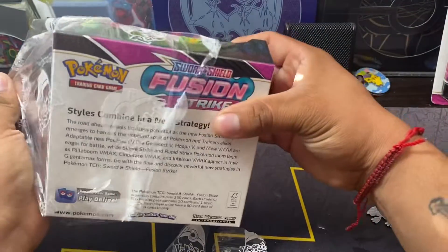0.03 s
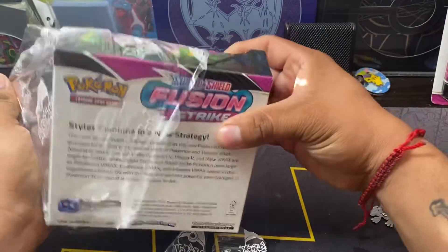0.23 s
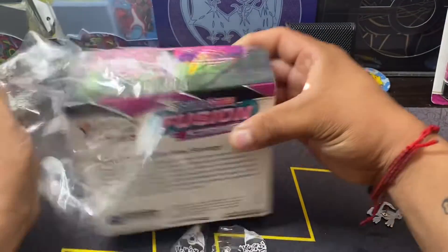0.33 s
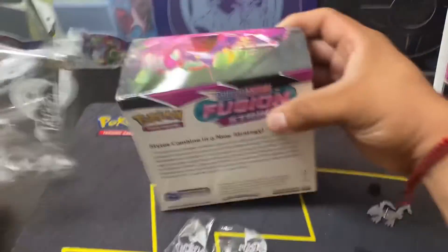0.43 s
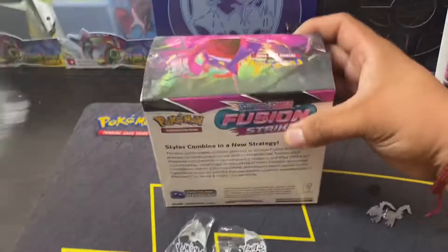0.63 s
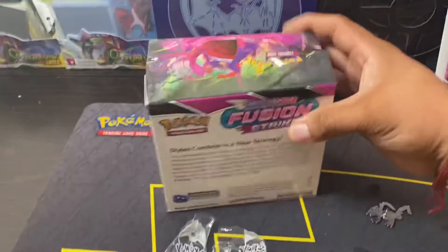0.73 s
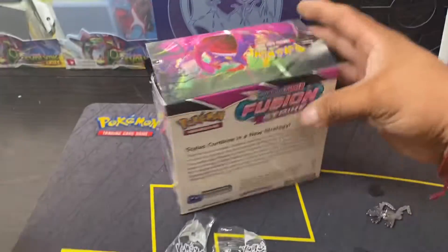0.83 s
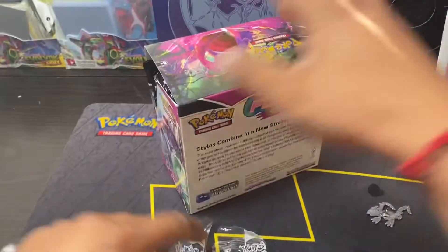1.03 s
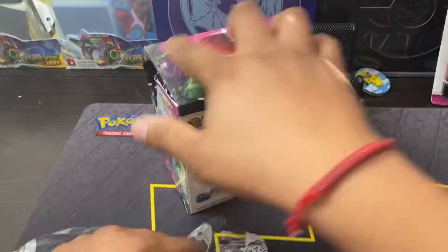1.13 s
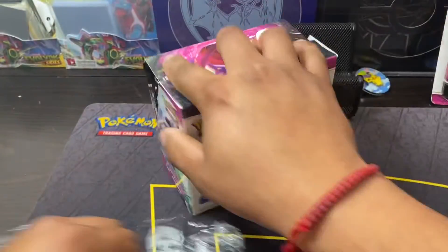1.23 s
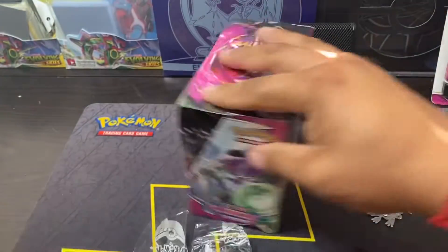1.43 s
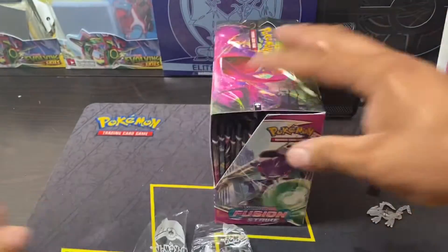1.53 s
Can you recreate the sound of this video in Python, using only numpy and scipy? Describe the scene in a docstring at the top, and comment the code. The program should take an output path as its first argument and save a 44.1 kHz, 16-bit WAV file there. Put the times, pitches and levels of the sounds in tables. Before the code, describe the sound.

Crisp shrink wrap rips sharply from a small carton with a hollow cardboard knock, then crackles faintly as hands handle film and box at a table, close up in a quiet room, mono.

```python
"""At a table in a quiet room, thin shrink film is ripped off a cardboard box: two loud tears with a dense rip between.
Then single snaps stand out over a fine crackle as the film is crumpled and hands slide on the box.
Film sounds are short noise bursts and ringing creases; the box and table are sets of fading sine tones.
A low flutter sags in pitch after the tear, walls answer the snaps and knocks, and soft hiss and rumble lie behind."""
import sys
import numpy as np
from scipy import signal
from scipy.fft import rfft, irfft, next_fast_len
from scipy.io import wavfile
from scipy.ndimage import uniform_filter1d

SR = 44100
rng = np.random.default_rng(int(sys.argv[2]) if len(sys.argv) > 2 else 0)


def ratio_of_db(decibels):
    """Turn decibels (scalar or array-like) into linear amplitude factors; 0 dB maps to 1."""
    return 10 ** (np.asarray(decibels, float) / 20)


def digitize_waveform(pressure):
    """Quantize a signal to 16-bit integers and store it at the path in sys.argv[1].

    Rows of a 2-D input are taken as channels; values are limited to [-1, 1].
    """
    field = np.atleast_2d(pressure).T
    bounded = np.clip(field, -1, 1)
    quanta = np.round(bounded * 32767).astype(np.int16)
    wavfile.write(sys.argv[1], SR, quanta)


N = 70560  # length in samples: 1.6 s

# single snaps of the film: t/s, relative level/dB, low crease f/Hz, high crease f/Hz,
# low crease over high crease level/dB, fade by 60 dB t/s
SNAPS = [(0.0086, -26.5, 6400, 11400, -16, 0.0072), (0.0625, -35.5, 1800, 9600, 19, 0.015),
         (0.0726, -32, 6370, 9280, 5, 0.0075), (0.0775, -28, 6800, 10600, -16, 0.016),
         (0.111, -31, 2000, 12200, 1, 0.0056), (0.137, -36, 2000, 9700, 0, 0.012),
         (0.183, -32.5, 2000, 10500, -1, 0.0093), (0.1962, -17.5, 4940, 10100, 10, 0.0062),
         (0.21, 0, 4230, 10800, 1.5, 0.0056), (0.2136, -11, 2980, 10700, -4, 0.006),
         (0.2317, -18, 1810, 10300, -13, 0.017), (0.28, -20, 6750, 10500, -7, 0.015),
         (0.2853, -4, 7460, 10400, -18, 0.008), (0.2877, -8.5, 7500, 9700, 2, 0.008),
         (0.3232, -21, 7260, 9700, -7, 0.015), (0.3424, -42, 5430, 10800, -3, 0.011),
         (0.394, -33.5, 3600, 11800, 9, 0.011), (0.411, -26.5, 6800, 11200, -10, 0.0084),
         (0.449, -32, 6060, 9110, 15, 0.0083), (0.4625, -32.5, 3380, 11000, 5, 0.011),
         (0.562, -18, 6100, 9600, 4.5, 0.0064), (0.562, -29.5, 2060, 3600, 16, 0.01),
         (0.582, -21, 3550, 11100, -30, 0.012), (0.597, -34.5, 3300, 11800, 2, 0.013),
         (0.6033, -25.5, 3160, 9450, 0, 0.0065), (0.6575, -39, 6170, 11500, 8, 0.011),
         (0.7256, -33, 5840, 12300, -15, 0.017), (0.7583, -25, 4400, 6200, 1, 0.02),
         (0.761, -27.5, 3650, 9600, 4, 0.015), (0.804, -27.5, 6620, 11700, -21, 0.014),
         (0.8154, -35, 3470, 9920, -1, 0.017), (0.863, -36, 4070, 10300, 8, 0.013),
         (0.876, -34, 6970, 10800, -6, 0.011), (0.8886, -33, 4700, 9820, 2, 0.029),
         (0.9389, -28, 2330, 10200, -4, 0.0069), (0.945, -32, 6120, 10000, -2, 0.012),
         (0.9684, -31, 6660, 9800, 7, 0.0098), (0.9782, -27.5, 3830, 5500, 9, 0.02),
         (0.998, -29, 4830, 11000, 0, 0.011), (1.0128, -31, 5770, 10100, 15, 0.012),
         (1.0253, -27, 5920, 10200, 18, 0.0083), (1.049, -28, 6000, 12700, 16, 0.013),
         (1.094, -26.5, 5830, 13500, -9, 0.014), (1.1102, -24, 6000, 9800, 8, 0.0065),
         (1.128, -22.5, 5300, 13700, 2, 0.011), (1.1357, -17.5, 4900, 10200, -3, 0.006),
         (1.1533, -26, 5220, 10000, 7, 0.0095), (1.1714, -26.5, 4900, 13000, -21, 0.022),
         (1.1902, -24, 6440, 10200, -19, 0.013), (1.2062, -31, 6150, 10500, -8, 0.011),
         (1.289, -41, 1730, 12200, 10, 0.019), (1.3684, -33, 6400, 10100, 4, 0.0083),
         (1.4414, -28, 2600, 9000, -3, 0.0056), (1.5123, -31.5, 5800, 9650, -5, 0.011),
         (1.539, -25.5, 2500, 11400, 4, 0.01), (1.5536, -29, 6170, 7500, -3, 0.01)]
# hands on film and box: t/s, crackle level/dB, low cardboard rub level/dB
HANDLING = [(0, -69, -54.5), (.05, -90, -65), (.1, -52, -58.5), (.17, -61, -66), (.205, -57, -52),
            (0.224, -60, -37.5), (.245, -37.5, -48.5), (.26, -35, -45), (.275, -38, -47.5),
            (0.299, -41, -43), (.315, -39, -46), (0.34, -36, -44), (0.369, -54.5, -57), (.42, -52.5, -55),
            (.47, -56.5, -60), (.485, -70, -63), (.55, -56, -63), (.575, -61, -60), (0.611, -45.5, -49.5),
            (.63, -55, -62), (.7, -56.5, -59.5), (.76, -49.5, -61), (.79, -53.5, -65.5), (.88, -49.5, -56),
            (.92, -53, -63.5), (.96, -47.5, -53.5), (1.04, -44.5, -53), (1.07, -54.5, -62.5),
            (1.14, -43, -50), (1.2, -45, -57), (1.3, -48, -60.5), (1.33, -50.5, -65), (1.43, -58, -71),
            (1.521, -57.5, -70), (1.557, -49, -55), (1.6, -67, -65)]
# tone of the film: f/Hz, relative level/dB (per Hz)
FILM_TONE = [(700, -25.5), (1200, -2.5), (1800, -8), (2600, -13), (3300, -7), (4200, -6.5), (5200, -6),
             (7000, -6.5), (8500, -6), (10300, -2), (12000, -4), (14500, -6), (16000, -9)]
# tone of the rub on cardboard: f/Hz, relative level/dB (per Hz)
RUB_TONE = [(100, -34.5), (200, -6), (350, -4), (620, -1), (900, 2), (1300, -2.5), (1800, -8.5),
            (2500, -16.5), (4000, -64.5)]
# papery rustle in the low treble: t/s, level/dB
RUSTLE = [(0, -82), (.2, -63), (.23, -46), (.33, -66), (.37, -77), (.6, -65), (.7, -75), (.9, -75),
          (.97, -63.5), (1.07, -72.5), (1.15, -63.5), (1.29, -57.5), (1.33, -70), (1.4, -70), (1.46, -63),
          (1.52, -71.5), (1.56, -57), (1.6, -72)]
# tone of the rustle: f/Hz, relative level/dB (per Hz)
RUSTLE_TONE = [(1000, -25), (1450, -4.5), (1850, -1.5), (2200, -13.5), (3000, -36.5)]
# hollow knocks of the box: t/s, relative level/dB, tilt/dB per octave, pitch ratio from the grip
KNOCKS = [(0.061, -51.5, 3, 1.07), (0.2107, -22, 2, 1.12), (0.2112, -26, -6, 1.34),
          (0.2856, -17.5, 1.5, .98), (0.315, -42.5, -10, 0.99), (0.32, -29.5, 1, 0.94),
          (0.448, -44.5, 9.5, 1.05), (0.561, -47.5, 7, 1.1), (0.604, -51, 6, 1.15), (1.033, -40, 3.5, 0.96),
          (1.087, -45, 3, 0.88), (1.444, -57, 17, 0.96)]
# ringing modes of the box before the grip shifts them: f/Hz, relative level/dB, fade by 60 dB t/s
BOX_MODES = [(355, -12.5, 0.038), (461, 6.5, 0.017), (584, 14.5, 0.016), (925, 10, 0.022), (995, 10, 0.022),
             (1528, -3.5, 0.024), (1887, -5.5, 0.024)]
# thuds on the table: t/s, then level/dB of each of the four modes, share of the free ring time
THUDS = [(0.3187, -36.5, -62, -45, -40.5, 1.06), (1.0262, -41, -35, -44, -38, 0.32)]
# modes of the table top ringing freely: f/Hz, fade by 60 dB t/s
TABLE_MODES = [(62, 0.59), (114, 0.36), (232, 0.2), (340, 0.1)]
# echo of the room: f/Hz, fade by 60 dB t/s
WALLS = [(300, 0.52), (3000, 0.19), (12000, 0.27)]
# tone of the room's hiss: f/Hz, relative level/dB (per Hz)
HISS_TONE = [(100, -33.5), (190, -9), (300, -4), (900, -6), (1800, -18.5), (2800, -19), (4400, -14),
             (7000, -16), (10500, -13.5), (14000, -15), (16000, -34)]
# tone of the room's rumble: f/Hz, relative level/dB (per Hz)
RUMBLE_TONE = [(25, -35), (42, -0.5), (60, -3), (85, -15.5), (122, -1.5), (150, -8.5), (200, -35)]

LAG_S = 0.0008  # snaps and knocks start this long after their listed times
RISE_S = 0.0002  # quick rise of the rattle and of the crackle's grains


def unit(x):
    """Scale to an average strength (rms) of 1."""
    return x / np.sqrt(np.mean(x ** 2) + 1e-20)


def along(points, hz):
    """Read a curve of (Hz, value) points on a log frequency axis."""
    f, v = np.transpose(points)
    return np.interp(np.log(hz + 1), np.log(f + 1), v)


def coloured(x, tone):
    """Filter to the given tone without sounding ahead of the input; mean power gain is 1."""
    m = 2 * next_fast_len(len(x) // 2 + 4096)
    gain_db = np.maximum(along(tone, np.fft.rfftfreq(m, 1 / SR)), -80)
    # Folding the cepstrum puts the whole response after the input (minimum phase).
    cepstrum = irfft(np.log(unit(ratio_of_db(gain_db))), m)
    cepstrum[1:m // 2] *= 2
    cepstrum[m // 2 + 1:] = 0
    response = np.exp(rfft(cepstrum))
    return irfft(rfft(x, m) * response, m)[:len(x)]


def noise_like(tone):
    """Steady noise of the given tone, rms 1."""
    return unit(coloured(rng.standard_normal(N), tone))


def add(track, s, sound):
    """Mix a sound in at time s."""
    i = max(round(s * SR), 0)
    track[i:i + len(sound)] += sound[:len(track) - i]


def fade(t, t60, rise):
    """Quick rise, then an exponential fall by 60 dB in t60 seconds."""
    return (1 - np.exp(-t / rise)) * ratio_of_db(-60 * t / t60)


def patchy(x, depth_db):
    """Make random patches of time and frequency louder or softer."""
    z = signal.stft(x, nperseg=128)[2]
    field = uniform_filter1d(rng.standard_normal(z.shape), 4, 0)
    field = uniform_filter1d(field, 16, 1)
    return signal.istft(z * ratio_of_db(depth_db * unit(field)), nperseg=128)[1][:N]


def crease(push, hz):
    """A fold of the film rings at its own pitch when pushed."""
    return unit(signal.lfilter(*signal.iirpeak(hz, 5.1, SR), push))


def snaps():
    """Each snap: a sharp pluck rings two creases, with a broad crack and a short rattle after."""
    snap_db, pluck_db, crack_db = -7.5, 13, -4
    rattle_db, rattle_t60 = -14, 0.07
    out, t = np.zeros(N), np.arange(SR // 10) / SR
    for s, db, low_hz, high_hz, low_db, t60 in SNAPS:
        noise = rng.standard_normal((4, len(t)))
        shape = fade(t, t60, 0.03 * t60)
        pluck = ratio_of_db(pluck_db) * (np.arange(len(t)) == np.argmax(shape))  # one sample at the peak
        low = crease(noise[0] * shape + pluck, low_hz)
        high = crease(noise[1] * shape + pluck, high_hz)
        broad = ratio_of_db(crack_db + max(low_db, 0)) * unit(noise[2] * shape)
        snap = unit(broad + ratio_of_db(low_db) * low + high)
        snap = snap * np.sqrt(np.mean(shape ** 2))  # the strength of the fading shape
        rattle = ratio_of_db(rattle_db) * noise[3] * fade(t, rattle_t60, RISE_S)
        add(out, s + LAG_S, ratio_of_db(db + snap_db) * (snap + rattle))
    return coloured(out, FILM_TONE)


def handling():
    """Countless tiny creases crackle over a smooth slide; cardboard adds a low rub and a papery rustle."""
    grains_per_s, grain_t60, size_spread_db = 1300, 0.0054, 5.5
    smooth_db, patchy_db = 1, 1.5
    s, crackle_db, rub_db = np.transpose(HANDLING)
    t = np.arange(N) / SR
    sizes = ratio_of_db(size_spread_db * np.clip(rng.standard_normal(N), -2, 2))
    hits = (rng.random(N) < grains_per_s / SR) * sizes
    swell = signal.fftconvolve(hits, fade(t[:SR // 50], grain_t60, RISE_S))[:N]
    grains = unit(swell * rng.standard_normal(N))
    slide = ratio_of_db(smooth_db) * rng.standard_normal(N)
    friction = patchy(grains + slide, patchy_db)
    crackle = unit(coloured(friction, FILM_TONE)) * ratio_of_db(np.interp(t, s, crackle_db))

    # The rub shares the crackle's unevenness; the rustle shares the timing of its grains.
    rub = unit(coloured(rng.standard_normal(N) + 0.81 * friction, RUB_TONE))
    rub = rub * ratio_of_db(np.interp(t, s, rub_db))
    paper = unit(swell * rng.standard_normal(N)) + 0.43 * rng.standard_normal(N)
    rustle = unit(coloured(paper, RUSTLE_TONE)) * ratio_of_db(np.interp(t, *np.transpose(RUSTLE)))
    return crackle + rub + rustle


def box_knocks():
    """Knocks ring the same cardboard modes; harder contact favours treble, a tighter grip raises pitch."""
    knock_db, tilt_pivot_hz, rise_s = -9.5, 700, 0.0015
    out, t = np.zeros(N), np.arange(SR // 8) / SR
    for s, db, tilt_db, grip in KNOCKS:
        luck_db = rng.normal(0, 1.2, len(BOX_MODES))  # each knock excites the modes a little differently
        knock = np.zeros(len(t))
        for (hz, mode_db, t60), extra_db in zip(BOX_MODES, luck_db):
            level_db = db + knock_db + mode_db + extra_db + tilt_db * np.log2(hz / tilt_pivot_hz)
            knock += ratio_of_db(level_db) * np.sin(2 * np.pi * grip * hz * t) * fade(t, t60, rise_s)
        add(out, s + LAG_S, knock)
    return out


def table_thuds():
    """Low table modes thud softly, neighbours in opposite phase; a resting hand shortens the ring."""
    rise_s = 0.0051
    out, t = np.zeros(N), np.arange(SR // 2) / SR
    for s, *levels_db, share in THUDS:
        thud = np.zeros(len(t))
        for k, ((hz, t60), db) in enumerate(zip(TABLE_MODES, levels_db)):
            ring = np.sin(2 * np.pi * hz * t) * fade(t, share * t60, rise_s)
            thud += (-1) ** k * ratio_of_db(db) * ring
        add(out, s, thud)
    return out


def flutter():
    """An unsteady low tone that falls in pitch as it dies."""
    start_s, level_db, start_hz, sag_hz_per_s = 0.31, -49, 285.4, 580
    t60, rise_s = 1, 0.043
    out, t = np.zeros(N), np.arange(SR // 4) / SR
    waver = 1 + 0.59 * unit(uniform_filter1d(rng.standard_normal(len(t)), size=600))
    tone = np.sin(2 * np.pi * np.cumsum(start_hz - sag_hz_per_s * t) / SR)
    tone = tone * np.cos(np.pi / 2 * t / t[-1])  # reaches silence at the end
    add(out, start_s, ratio_of_db(level_db) * waver * tone * fade(t, t60, rise_s))
    return out


def walls(x):
    """The room answers with fading noise; each frequency dies at its own speed."""
    hz, t, z = signal.stft(rng.standard_normal(SR // 2), SR, nperseg=256)
    decay = ratio_of_db(-60 * t / along(WALLS, hz)[:, None])
    tail = signal.istft(z * decay, SR, nperseg=256)[1]
    delayed = np.pad(x, (250, 0))  # in samples
    return signal.fftconvolve(delayed, tail / np.linalg.norm(tail))[:N]


def room_hush():
    """The quiet room is steady noise: a soft hiss and a low rumble."""
    hiss_db, rumble_db = -59.5, -62
    return ratio_of_db(hiss_db) * noise_like(HISS_TONE) + ratio_of_db(rumble_db) * noise_like(RUMBLE_TONE)


def scene():
    """Snaps and knocks with their echo, then handling, thuds, flutter and the quiet room."""
    walls_db = -22
    near = snaps() + box_knocks()
    echo = ratio_of_db(walls_db) * walls(near)
    mix = near + echo + handling() + table_thuds() + flutter() + room_hush()
    return mix[None]  # one channel


def low_pass(x):
    """Removes everything above the highest recorded frequency."""
    return signal.sosfilt(signal.butter(12, 16970, fs=SR, output="sos"), x)


def record(dry):
    """Cut away everything from 15.8 kHz up and finish the mix."""
    top_hz = 15800
    below_top = np.fft.rfftfreq(N, 1 / SR) < top_hz
    mix = irfft(rfft(dry) * below_top, N)
    return low_pass(mix)


dry = scene()
out = record(dry)
digitize_waveform(out)
```